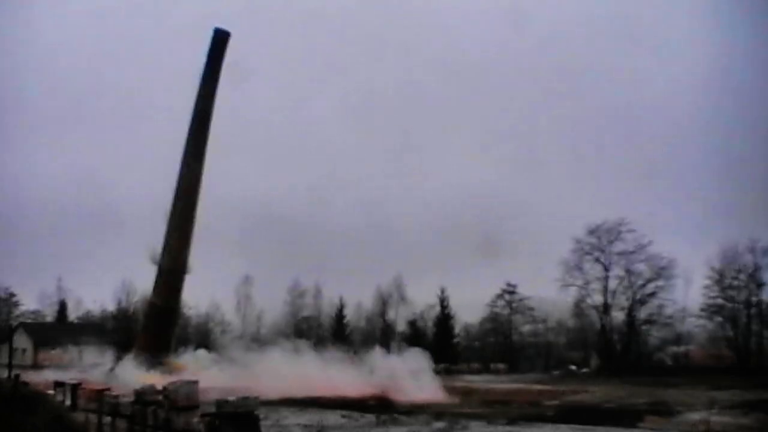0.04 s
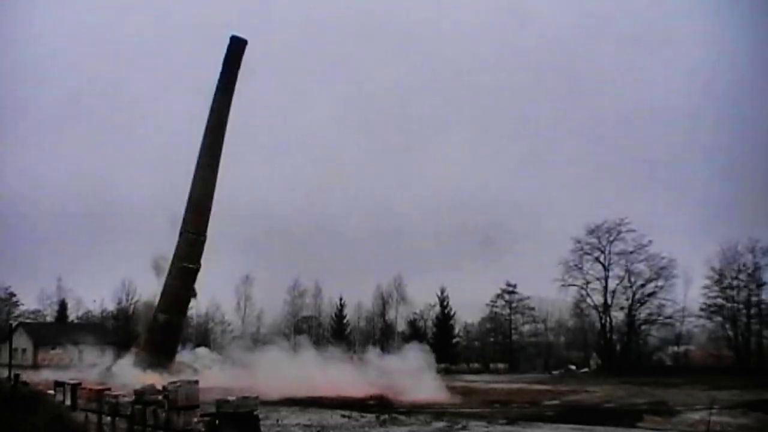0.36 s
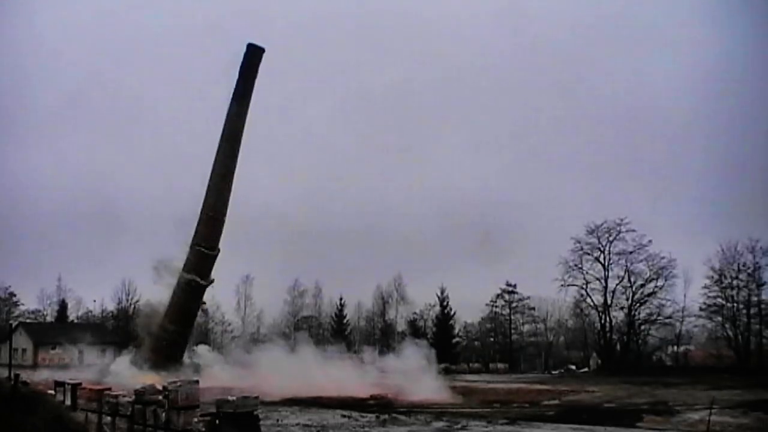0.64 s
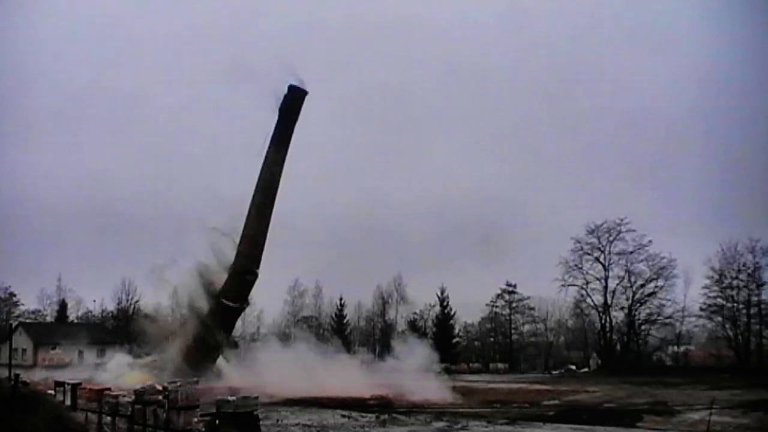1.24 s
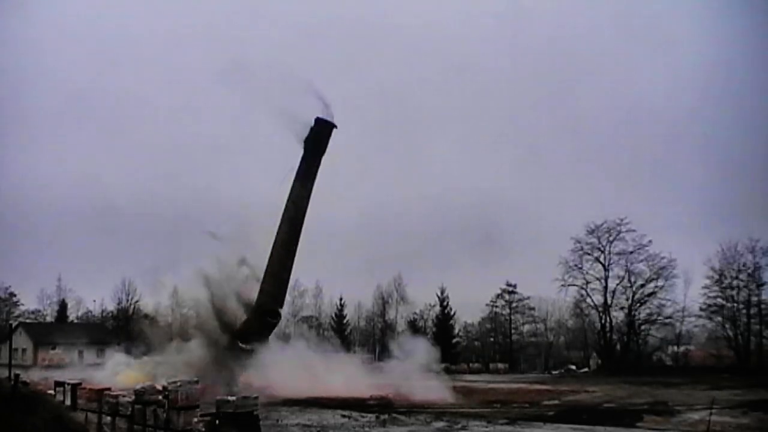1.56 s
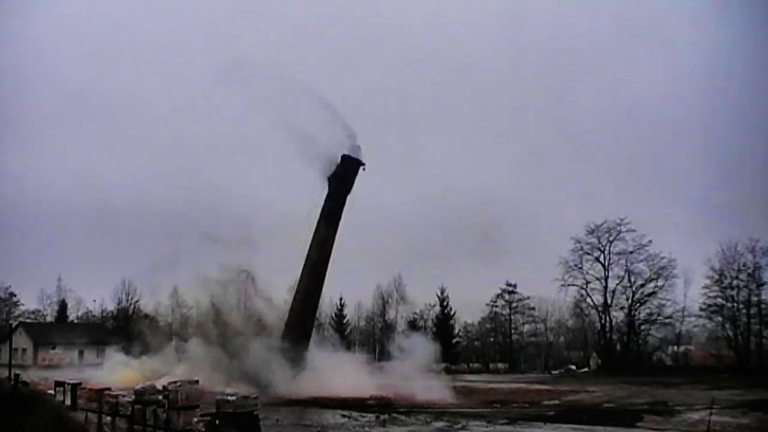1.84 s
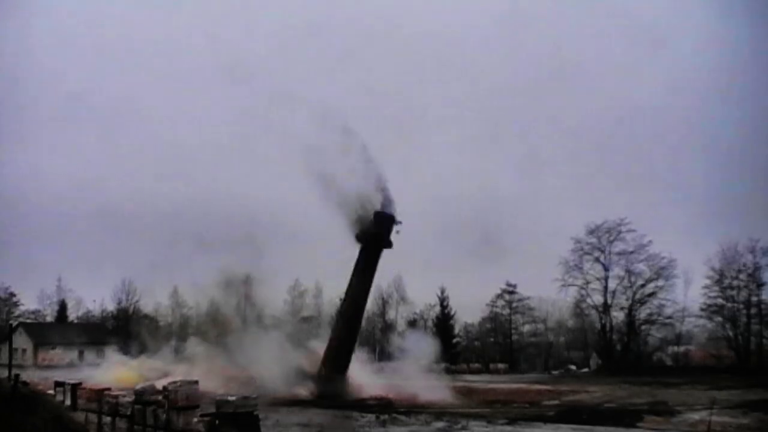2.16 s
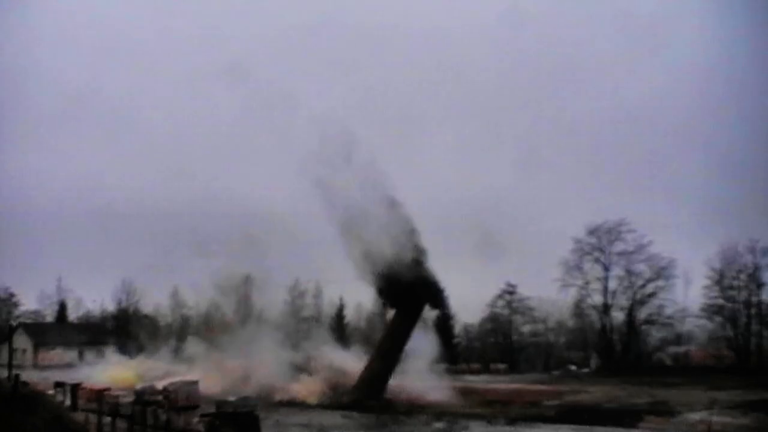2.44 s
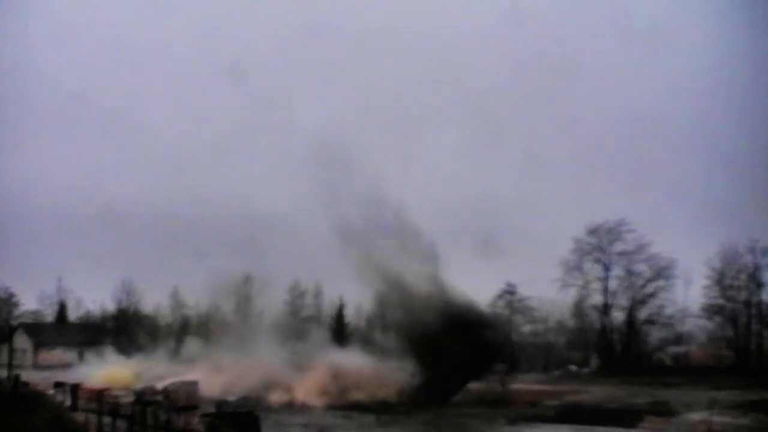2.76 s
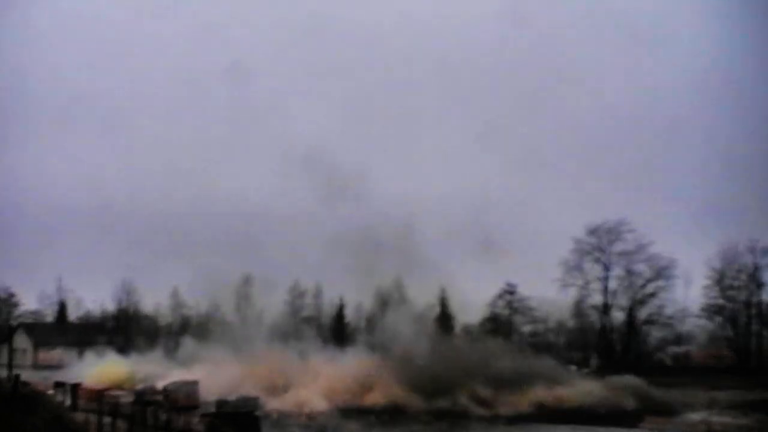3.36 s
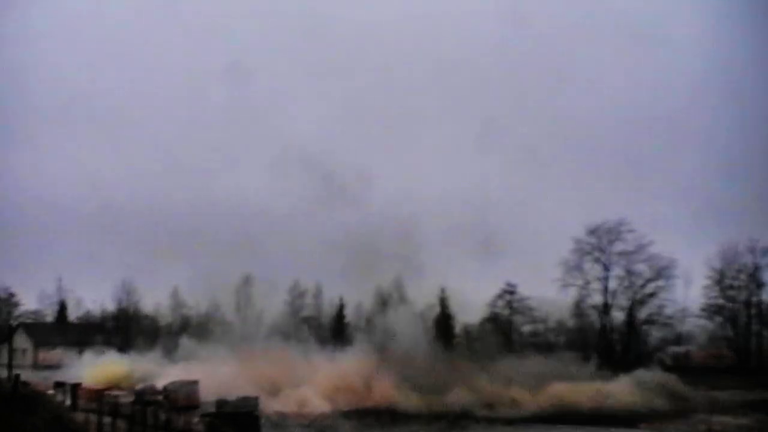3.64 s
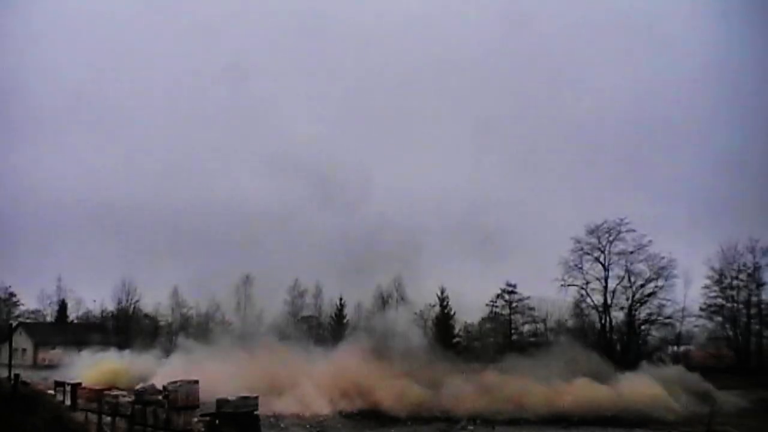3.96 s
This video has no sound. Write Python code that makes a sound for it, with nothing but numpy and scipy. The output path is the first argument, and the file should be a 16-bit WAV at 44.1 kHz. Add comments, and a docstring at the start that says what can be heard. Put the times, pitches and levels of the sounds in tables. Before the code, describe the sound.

A tall brick chimney collapses, crumbling and then crashing down in a roar of clattering rubble.

```python
"""On open ground, a tall brick chimney sinks onto its crumbling foot, leans over and crashes down.
Countless impacts superpose into rumble, roar, clatter and a spray of grit. Sections of wall land in
volleys of shocks, lumps thud, and single bricks crack as they split or squeak and groan as they scrape.
The site reflects a faint echo, and light gusts buffet the microphone."""
import sys
import numpy as np
from scipy import signal
from scipy.fft import rfft, irfft
from scipy.io import wavfile

SR = 44100
rng = np.random.default_rng(int(sys.argv[2]) if len(sys.argv) > 2 else 0)


def store_wav(level_fs):
    """Save 16-bit WAV to argv[1]."""
    pcm = np.round(np.clip(np.atleast_2d(level_fs), -1, 1) * 32767)
    wavfile.write(sys.argv[1], SR, pcm.T.astype(np.int16))


N = 176400


# Course of the collapse in four bands: time_s, rumble_db, roar_db, clatter_db, grit_db
BAND_LEVELS = [(0, -49, -33, -27, -37.5), (.22, -45, -35, -33, -39.5), (.37, -43, -30, -28, -36.5),
               (.7, -51, -41.5, -31, -37), (.82, -48, -38.5, -34, -37), (.9, -53, -39, -37, -41),
               (1.08, -47.5, -34, -37.5, -42.5), (1.29, -41, -28, -29.5, -35),
               (1.42, -42, -29.5, -34, -37.5), (1.78, -34, -28.5, -29, -30),
               (2.03, -35.5, -20.5, -22.5, -26), (2.2, -42, -15, -21, -26.5), (2.42, -38, -21, -22, -27.5),
               (2.51, -37, -16.5, -19, -21.5), (2.55, -43, -23, -26, -31), (2.62, -48, -17, -20.5, -22.5),
               (2.741, -36, -21, -22.5, -24), (2.84, -33.5, -18.5, -17.5, -21.5),
               (3.14, -42, -18, -20, -26), (3.25, -31, -17, -16.5, -22), (3.29, -54, -23, -20, -26),
               (3.47, -52, -27, -25.5, -28), (3.6, -46, -23, -25, -25), (3.82, -42.5, -21, -17.5, -22.5),
               (4, -46, -18, -23.5, -23.5)]
# Impact statistics, one row a band, rumble to grit: impacts_per_s, size_spread_db, clumping_db, trim_db
IMPACT_SHOWERS = [(726, 4.5, 1.5, 0), (1282, 2, 0.97, -0.8), (2030, 0.5, 1.3, -2), (3180, -1, 1.57, -1)]
def rubble():
    """Shot noise: dense random impacts merge into four bands that swell and clump together."""
    times, *levels = np.transpose(BAND_LEVELS)
    clump_s = 0.03
    clumps = noise(N, lambda f: np.exp(-(f * clump_s) ** 2) * np.minimum(f / 20, 1))
    out = np.zeros(N)
    for band, (per_s, spread_db, clump_db, trim_db) in enumerate(IMPACT_SHOWERS):
        shower = masonry(impacts(N, per_s, spread_db) * amp(clump_db * clumps), band)
        out += shower * amp(np.interp(seconds(N), times, levels[band]) + trim_db)
    return out


# Spectral density of broken masonry: frequency_hz, level_db
MASONRY_SPECTRUM = [(15, -60), (25, -26), (53, -17.5), (164, -7.5), (215, -10), (389, -1), (722, -1.5),
                    (2060, -8), (3830, -15.5), (4380, -12.5), (8130, -12.5), (9550, -18.5), (15500, -52)]
# Limits of the bands 0 rumble, 1 roar, 2 clatter and 3 grit: edge_hz
BAND_EDGES = [35, 210, 1100, 3600, 15500]
def masonry(force, band):
    """Source and filter: impacts take on the spectrum of masonry within one band, at rms 1."""
    low_hz, high_hz = BAND_EDGES[band], BAND_EDGES[band + 1]
    def response(f):
        skirts = np.hypot(1, (low_hz / f) ** 5) * np.hypot(1, (f / high_hz) ** 5)
        return gain_at(MASONRY_SPECTRUM, f) / skirts
    return unit(minimum_phase(force, response))


# Hollow colour of the crumbling foot: frequency_hz, gain_db
FOOT_COLOUR = [(90, 3.5), (180, -2), (300, 4.5), (850, -0.5), (3000, 2.5), (4200, -2.5), (6500, -1)]
def crumbling_foot(debris):
    """Spectral colouring: rubble sounds hollow while only the foot crumbles, until the shaft lands."""
    end_s, fade_s = 2.38, 0.5
    share = np.clip((end_s - seconds(N)) / fade_s, 0, 1)
    hollow = shaped(debris, lambda f: gain_at(FOOT_COLOUR, f))
    return debris + share * (hollow - debris)


# Sections of wall landing: start_s, length_s, body_db, edge_db
WALL_LANDINGS = [(.512, 0.017, -24.5, -23), (.758, 0.016, -50, -25.5), (1.67, 0.038, -25.5, -48),
                 (1.821, 0.036, -16.5, -19.5), (2.099, 0.015, -12, -32), (2.148, 0.007, -12, -21),
                 (2.173, 0.048, -13.5, -26), (2.258, 0.03, -18, -22.5), (2.344, 0.014, -15, -27),
                 (2.505, 0.015, -17.5, -22), (2.682, .019, -25, -21), (2.855, .012, -22, -17.5),
                 (3.005, 0.022, -24, -15.5), (3.057, 0.0099, -13.5, -21), (3.111, 0.0054, -13.5, -13),
                 (3.174, 0.02, -15, -30), (3.255, 0.0096, -22, -18.5), (3.355, 0.024, -20, -25),
                 (3.628, 0.008, -23, -19), (3.745, 0.013, -22, -20.5)]
def wall_crash(length_s, body_db, edge_db):
    """Superposition: a tight volley of equal shocks excites a roaring body and a hard, clattering edge."""
    t = seconds(2 ** 13)
    rise_s, fall_s = 0.00051, 0.0041
    envelope = np.minimum(t / rise_s, 1) * np.exp(-np.maximum(t - length_s, 0) / fall_s)
    shocks = impacts(len(t), per_s=1300, spread_db=0)
    body = unit(masonry(shocks, band=1) * envelope)
    edge = unit(masonry(shocks, band=2) * envelope)
    return (amp(body_db) * body + amp(edge_db) * edge) * rms(envelope)


# Single lumps landing: start_s, level_db, pitch_hz
LUMP_LANDINGS = [(.192, -22, 1000), (1.0695, -14.5, 780), (1.204, -15, 1160), (1.673, -16, 276),
                 (1.797, -12, 380), (1.892, -3, 1160), (2.071, -10, 446), (2.106, -10, 203),
                 (2.176, -15, 167), (2.344, -14, 182), (2.686, -21.5, 114), (2.864, -26, 1430),
                 (2.945, -12, 1110), (3.013, -2, 816), (3.747, -8.5, 600)]
def lump_thud(level_db, pitch_hz):
    """Heavy damping: a lump lands with a tick of contact and a push that dies within a few cycles."""
    rise_cycles, contact_db = 0.55, -7
    cycles = pitch_hz * seconds(2 ** 12)
    push = np.sin(2 * np.pi * cycles) * cycles / rise_cycles * np.exp(1 - cycles / rise_cycles)
    tick = masonry(signal.unit_impulse(len(cycles)), band=3)
    return amp(level_db) * (push + amp(contact_db) * tick / abs(tick).max())


# Bricks splitting: start_s, level_db, decay_s
FRACTURES = [(.129, -26, .003), (.213, -26.5, 0.0077), (.352, -30.5, .012), (.629, -25.5, 0.019),
             (.688, -28, .002), (1.472, -30, 0.0035), (2.149, -21.5, 0.029), (2.457, -13, 0.0025),
             (2.529, -14, 0.0066), (2.748, -12, 0.0043), (3.005, -14.5, 0.0052), (3.629, -13.5, 0.016),
             (3.737, -16, 0.0075)]
def brick_crack(level_db, decay_s):
    """Brittle fracture: one sharp snap, then bright noise that decays exponentially."""
    envelope = np.exp(-seconds(2 ** 12) / decay_s)
    spit = rng.standard_normal(len(envelope)) * envelope
    spit[0] = 5  # the snap
    return amp(level_db) * masonry(spit, band=3) * rms(envelope)


BRICK_Q = 18
# Blocks and bricks scraping: start_s, level_db, pitch_hz
SQUEAKS = [(.146, -24, 1300), (.166, -21, 1480), (.839, -23.5, 1850), (1.289, -19.5, 570),
           (1.825, -10, 464), (2.202, -14.5, 636)]
def brick_squeak(level_db, pitch_hz):
    """Sliding friction: scraping masonry gives a short squeak or groan whose pitch sags and wavers."""
    t = seconds(2 ** 12)
    rise_s, fall_s, sag_per_s = 0.0018, 0.014, 6.2
    waver = noise(len(t), lambda f: np.exp(-(f * BRICK_Q / pitch_hz) ** 2))
    glide_hz = pitch_hz * np.exp(-sag_per_s * t) * (1 + .5 * waver / BRICK_Q)
    tone = np.sqrt(2) * np.sin(2 * np.pi * np.cumsum(glide_hz) / SR)
    envelope = np.minimum(t / rise_s, 1) * np.exp(-np.maximum(t - rise_s, 0) / fall_s)
    return amp(level_db) * tone * envelope


# Tumbling bricks, then flying chips: impacts_per_s, size_spread_db, trim_db, low_hz, high_hz
LOOSE_PIECES = [(112.2, 2.5, -7, 474, 3030), (101, 4, -11, 4370, 9100)]
def tumbling(per_s, spread_db, trim_db, low_hz, high_hz, band):
    """Damped oscillators: each piece has its own pitch and Q; together they follow one band's level."""
    t = seconds(N)
    times, *levels = np.transpose(BAND_LEVELS)
    hits = impacts(N, per_s, spread_db)
    smallness, ringing = rng.random((2, N))
    clacks = np.zeros(N)
    for i in np.flatnonzero(hits):
        pitch_hz = low_hz * (high_hz / low_hz) ** smallness[i]
        cycles = pitch_hz * t[:2 ** 11]
        ring = np.sin(2 * np.pi * cycles) * np.exp(-np.pi * cycles / BRICK_Q ** ringing[i])
        add(clacks, t[i], hits[i] * unit(ring))
    clacks = minimum_phase(clacks, lambda f: low_cut(f, low_hz / 2) / np.hypot(1, (f / high_hz) ** 10))
    return unit(clacks) * amp(np.interp(t, times, levels[band]) + trim_db)


def chip_spray():
    """Band-limited shot noise: fine chips brighten the treble as the top of the shaft bursts."""
    peak_s, span_s, level_db = 2.53, 0.16, -27
    centre_hz, width_hz = 8100, 1850
    chips = impacts(N, per_s=1300, spread_db=6.9)
    spray = shaped(chips, lambda f: np.exp(-((f - centre_hz) / width_hz) ** 2))
    swell = np.exp(-((seconds(N) - peak_s) / span_s) ** 2)
    return amp(level_db) * unit(spray) * swell


def site_echo(direct):
    """Reverberation: the ground, sheds and tree line return dull, scattered reflections."""
    t = seconds(SR)
    level_db, build_s, t60_s, top_hz = -17, 0.024, 0.49, 3780
    envelope = amp(-60 * t / t60_s) * np.minimum(t / build_s, 1)
    reflections = impacts(SR, per_s=2000, spread_db=0.91) * envelope
    tail = shaped(reflections, lambda f: 1 / np.hypot(1, f / top_hz))
    return amp(level_db) * signal.fftconvolve(direct, tail / np.linalg.norm(tail))[:N]


# Diffuse sound, side relative to mid: frequency_hz, gain_db
SIDE_SPECTRUM = [(110, -19), (330, -18.5), (1600, -31), (2700, -14.5), (5600, -15), (9500, -10)]
def diffuse_field(mid):
    """Decorrelation: scattering scrambles the phase, giving a side signal that widens the sound."""
    t = seconds(2 ** 13)
    decay_s = 0.025
    scatter = rng.standard_normal(len(t)) * np.exp(-t / decay_s)
    all_pass = irfft(np.exp(1j * np.angle(rfft(scatter))))
    return shaped(signal.fftconvolve(mid, all_pass)[:N], lambda f: gain_at(SIDE_SPECTRUM, f))


# Strength of the wind: time_s, level_db
GUST_LEVELS = [(0, -42), (.32, -31.5), (.57, -33.5), (.84, -41.5), (.98, -34), (1.3, -50)]
def wind():
    """Turbulence: uneven gusts press on the microphone ports as low, fluctuating noise."""
    low_hz, top_hz, flutter_hz, flutter_db = 100, 202, 14, 2
    gust_db = np.interp(seconds(N), *np.transpose(GUST_LEVELS))
    flutter = noise(N, lambda f: np.exp(-(f / flutter_hz) ** 2))
    buffet = noise(N, lambda f: low_cut(f, low_hz) / np.hypot(1, (f / top_hz) ** 1.6))
    return buffet * amp(gust_db + flutter_db * flutter)


def impacts(size, per_s, spread_db):
    """Poisson process: impulses of either sign, exponentially distributed in level up to a cap."""
    chance, strength, sign = rng.random((3, size))
    level_db = spread_db * np.minimum(-np.log(1 - strength), 3.6)
    return np.where(chance < per_s / SR, np.sign(sign - .5) * amp(level_db), 0)


def noise(size, gain):
    """Coloured Gaussian noise at rms 1."""
    return unit(shaped(rng.standard_normal(size), gain))


def shaped(x, gain):
    """Zero-phase filtering by a gain given as a function of frequency."""
    return irfft(rfft(x) * gain(np.fft.rfftfreq(len(x), 1 / SR) + 1e-3), len(x))


def minimum_phase(x, gain):
    """Causal filtering: the ringing only follows each blow."""
    hz = abs(np.fft.fftfreq(len(x), 1 / SR)) + 1e-3
    log_gain = np.log(np.maximum(gain(hz), 1e-5))
    response = np.exp(signal.hilbert(log_gain).conj())
    return irfft(rfft(x) * response[:len(x) // 2 + 1], len(x))


def low_cut(hz, corner_hz):
    """Gain of a second-order high-pass filter."""
    return 1 / np.hypot(1, (corner_hz / hz) ** 2)


def gain_at(spectrum, hz):
    """Gain from a decibel spectrum, interpolated over log frequency."""
    points_hz, db = np.transpose(spectrum)
    return amp(np.interp(np.log(hz + 1), np.log(points_hz + 1), db))


def amp(db):
    """Decibels to amplitude ratio."""
    return 10 ** (np.asarray(db) / 20)


def rms(x):
    """Root-mean-square amplitude."""
    return np.sqrt(np.mean(x ** 2) + 1e-20)


def unit(x):
    """Normalisation to rms 1."""
    return x / rms(x)


def seconds(size):
    """Time axis of a run of samples."""
    return np.arange(size) / SR


def add(mix, start_s, sound):
    """Superposition of a delayed sound on the mix."""
    part = mix[round(start_s * SR):][:len(sound)]
    part += sound[:len(part)]


def scene():
    """Mid-side stereo: the collapse is nearly centred; diffuse sound and wind arrive in antiphase."""
    direct = crumbling_foot(rubble()) + chip_spray()
    for band, row in enumerate(LOOSE_PIECES, 2):  # bricks follow the clatter, chips the grit
        direct += tumbling(*row, band)
    for table, source in ((WALL_LANDINGS, wall_crash), (LUMP_LANDINGS, lump_thud),
                          (FRACTURES, brick_crack), (SQUEAKS, brick_squeak)):
        for start_s, *row in table:
            add(direct, start_s, source(*row))
    mid = direct + site_echo(direct)
    side = diffuse_field(mid) + wind()
    pan_db = 0.29  # taken from the left, given to the right
    return np.array([(mid + side) * amp(-pan_db), (mid - side) * amp(pan_db)])


def record(dry):
    """Band limiting and saturation: a small microphone loses deep bass and top treble; peaks round off."""
    thin = np.array([shaped(channel, lambda f: low_cut(f, corner_hz=69)) for channel in dry])
    rounded = thin / (1 + thin ** 6) ** (1 / 6)
    top_hz = 15700
    low_pass = signal.firwin(511, top_hz, window=("kaiser", 9), fs=SR)
    return signal.oaconvolve(rounded, low_pass[None], "same")


dry = scene()
out = record(dry)
store_wav(out)
```